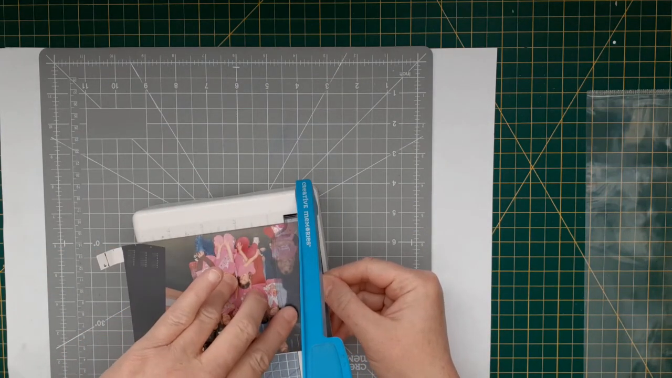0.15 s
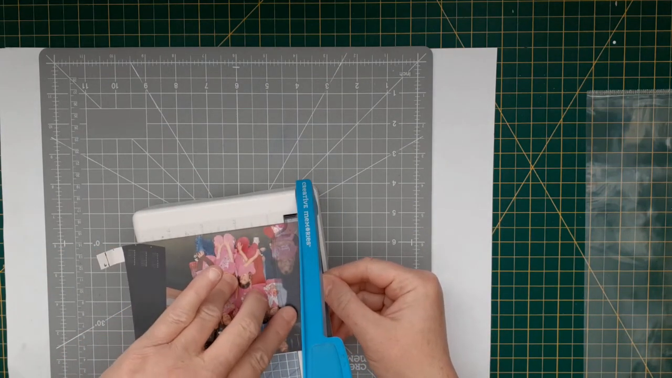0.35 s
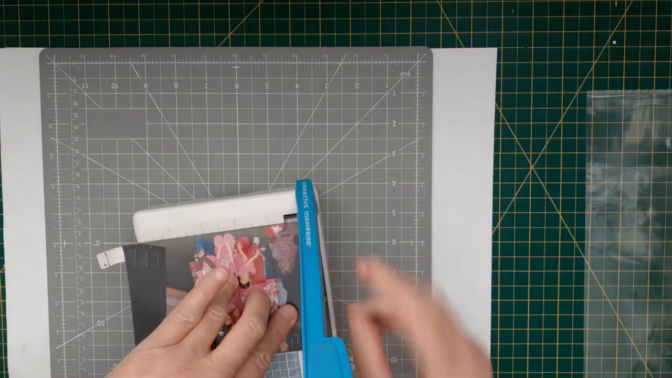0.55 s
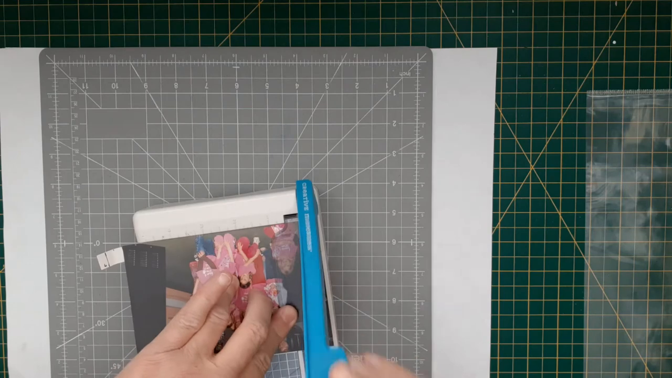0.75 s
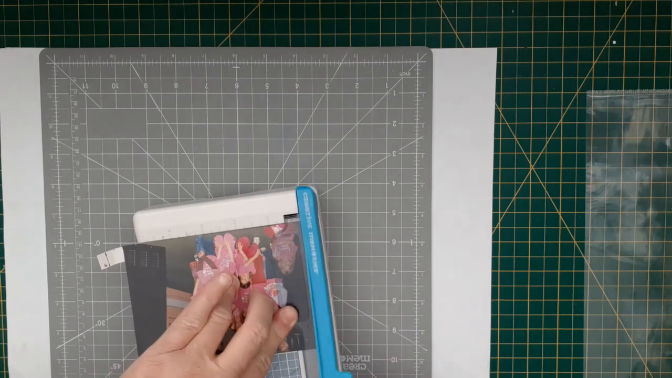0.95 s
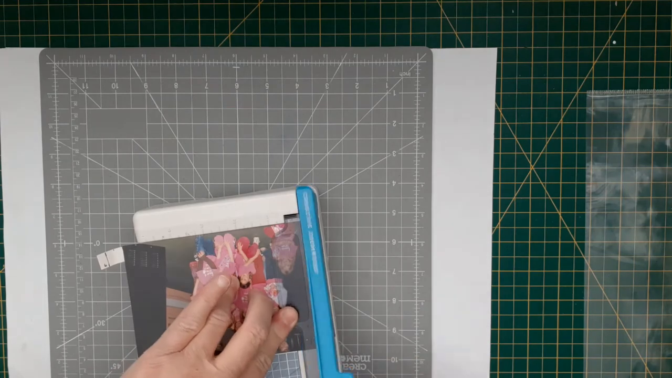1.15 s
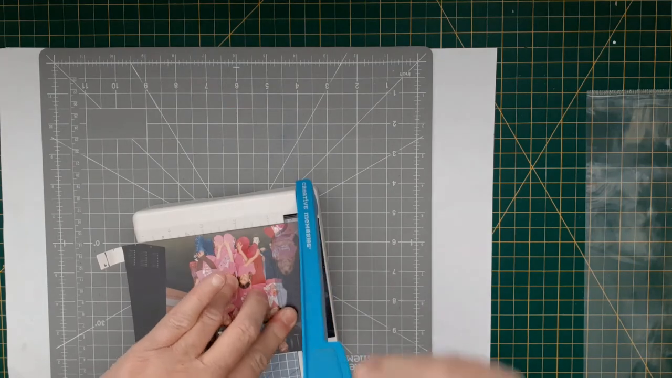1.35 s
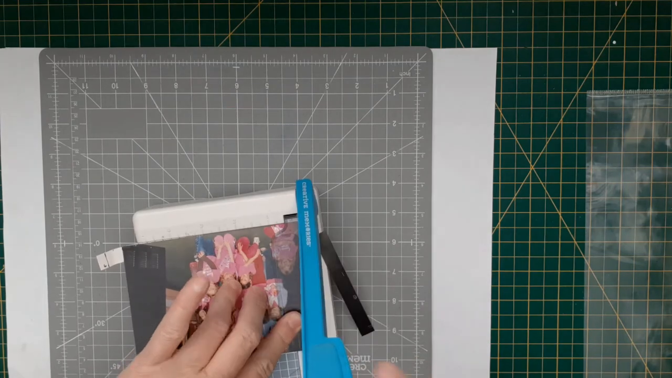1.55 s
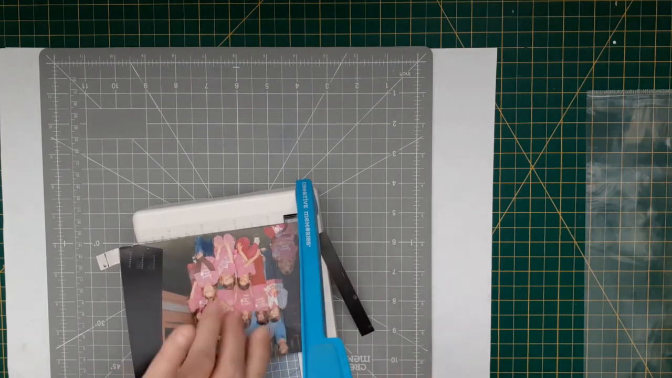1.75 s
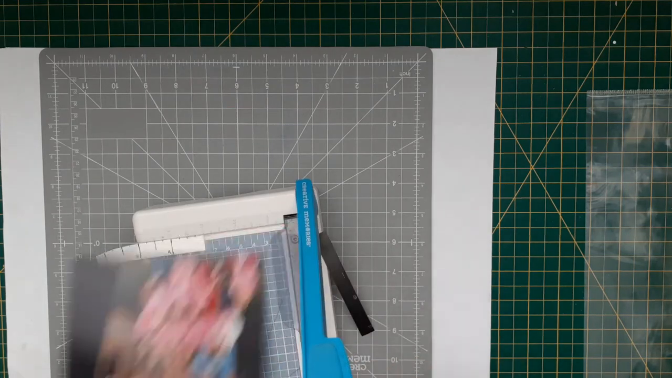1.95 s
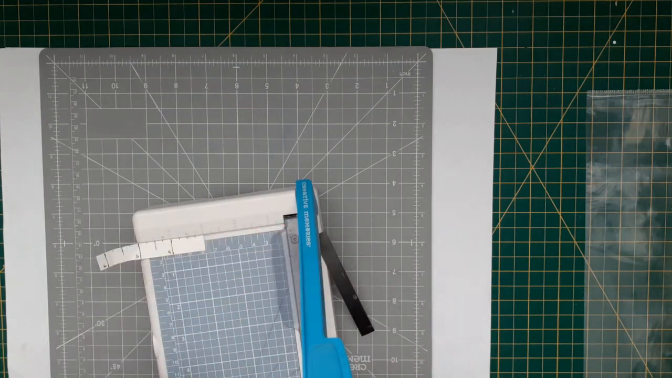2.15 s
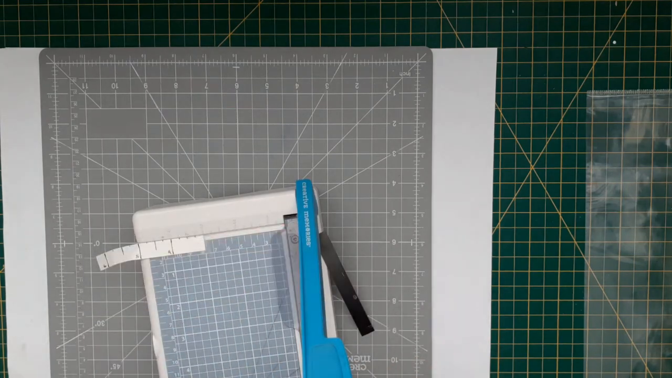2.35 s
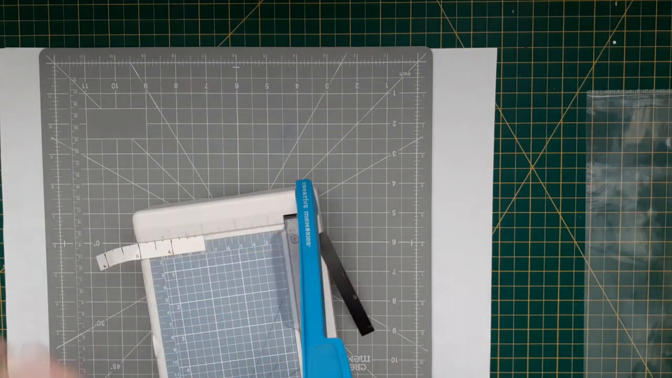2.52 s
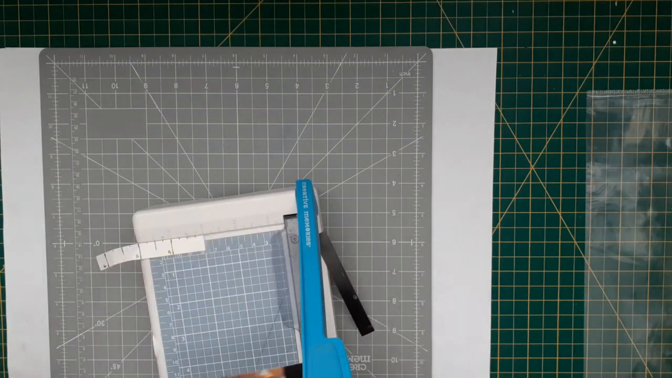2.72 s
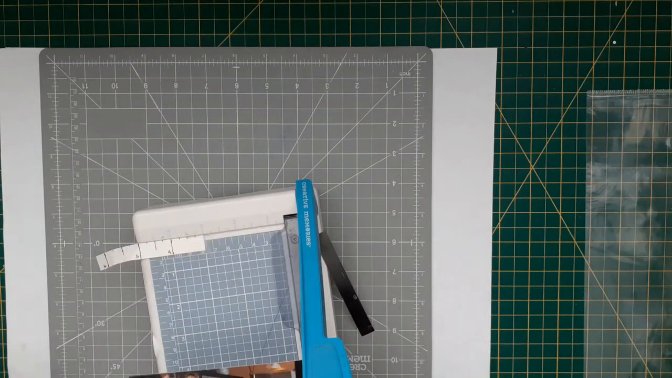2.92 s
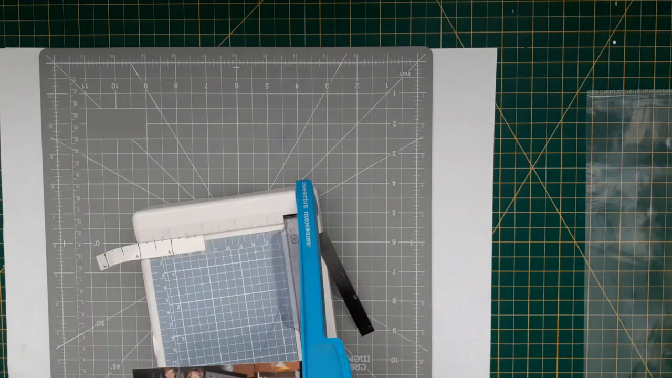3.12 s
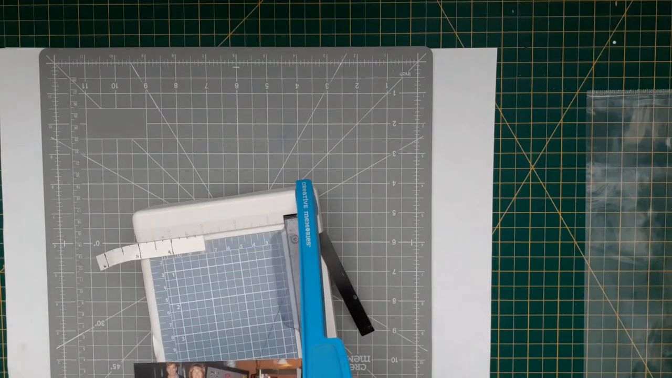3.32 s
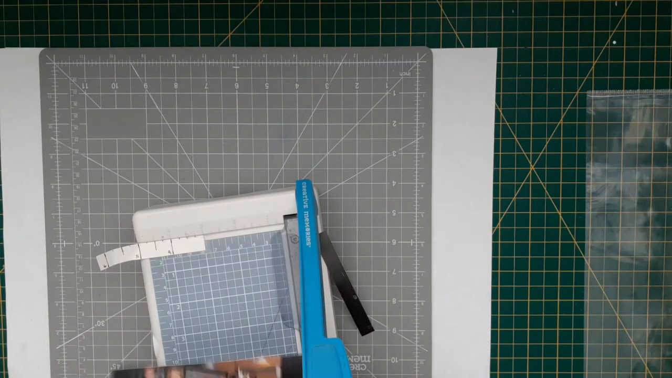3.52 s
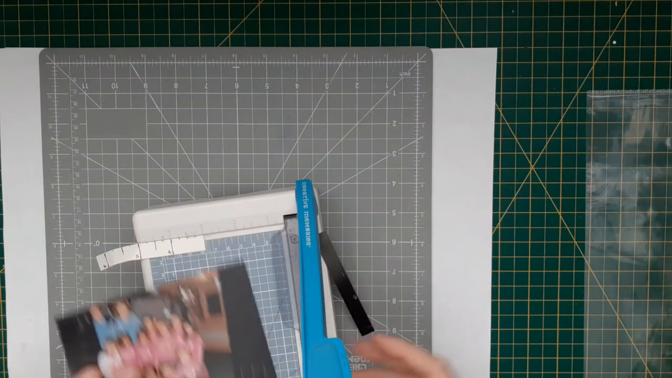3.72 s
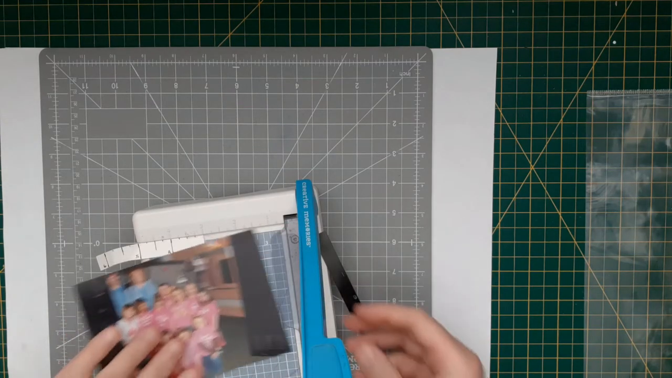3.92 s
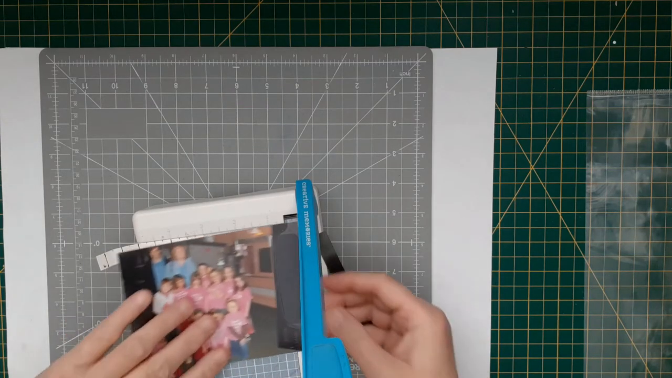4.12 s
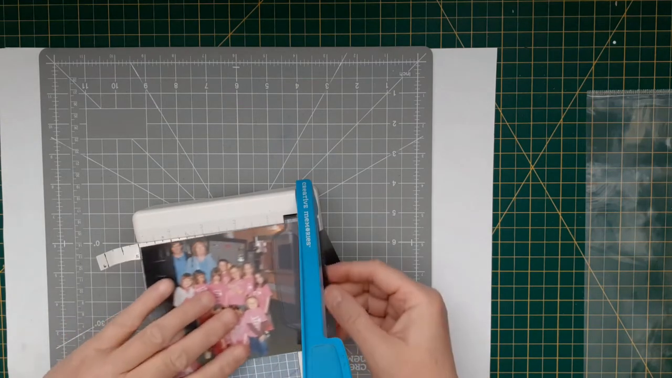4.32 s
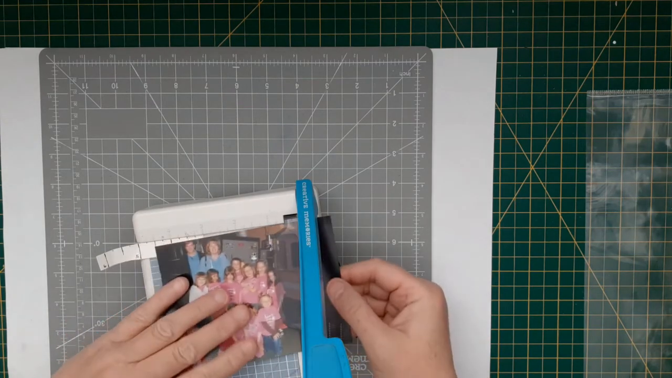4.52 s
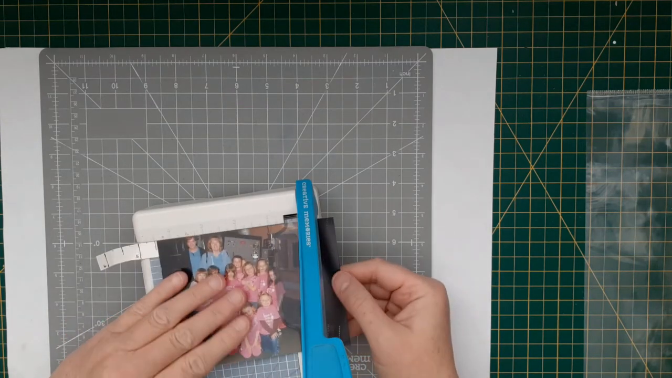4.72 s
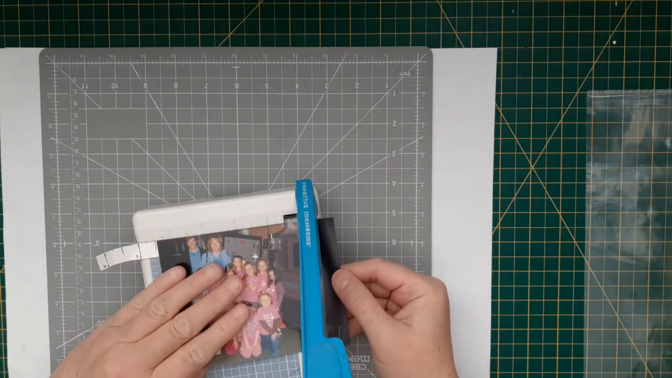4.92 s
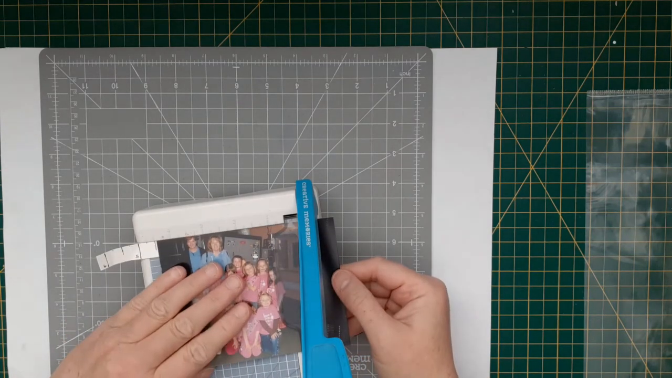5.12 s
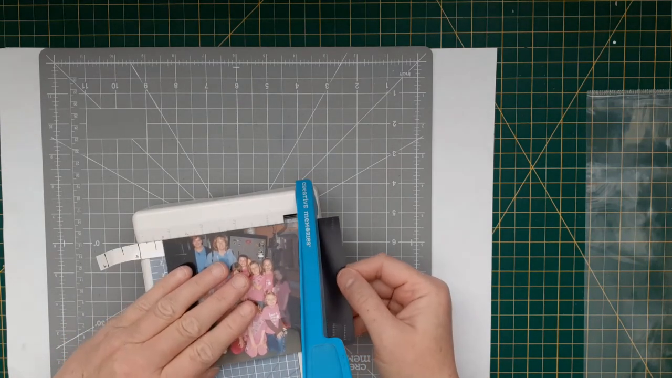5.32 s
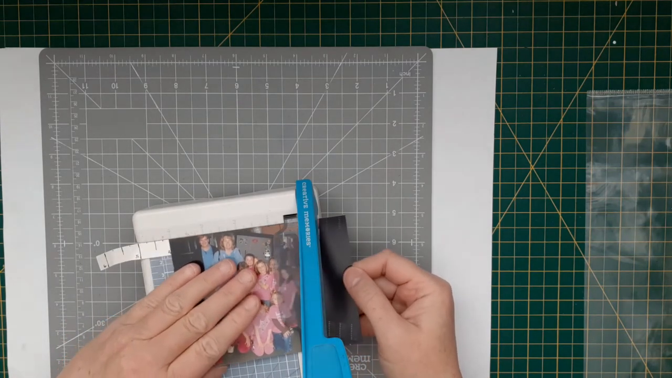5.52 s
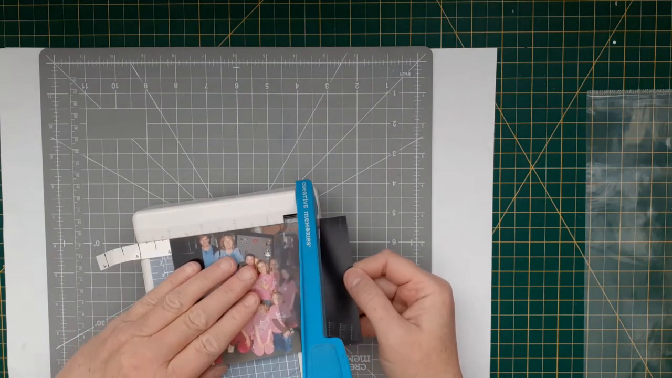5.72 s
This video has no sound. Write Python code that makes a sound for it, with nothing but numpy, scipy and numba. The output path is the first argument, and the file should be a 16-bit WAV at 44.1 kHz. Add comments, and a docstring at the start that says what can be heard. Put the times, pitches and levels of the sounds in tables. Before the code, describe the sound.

A lever trimmer blade rasps harshly through a stiff glossy print and thuds shut, then paper clicks, slides and a sharp snap follow over faint hum.

```python
"""Quiet air and a far motor's hum, then knocks and the rub of glossy paper on a small lever trimmer.
The blade rasps through a photo, thuds home and is lifted; slips excite its steel and plastic bed.
The print is slid off and put down; the next snaps against the bed and is slid into place.
Paper is shaped slip noise, each knock a short force on resonances; a deep drone runs up late.
It is heard from a phone above the desk in a dry room."""
import sys
import numpy as np
from scipy import signal
from scipy.fft import rfft, irfft
from scipy.io import wavfile
from scipy.ndimage import uniform_filter1d
from numba import njit

SR = 44100
rng = np.random.default_rng(int(sys.argv[2]) if len(sys.argv) > 2 else 0)


def master_out(mix):
    """Clip the mix to full scale and print it as 16-bit PCM to the path in sys.argv[1]."""
    frames = np.transpose(np.atleast_2d(mix))
    ceiling = np.clip(frames, -1, 1)
    pcm = np.round(ceiling * 32767).astype(np.int16)
    wavfile.write(sys.argv[1], SR, pcm)


N = 254016


def undb(db):
    """Decibels to amplitude."""
    return np.exp(np.asarray(db) * (np.log(10) / 20))


def unit(x):
    """Scale to rms 1."""
    return x / np.sqrt(np.mean(x ** 2))


def colour(x, points, size=4096):
    """Minimum-phase filter with the given (Hz, dB) response, built from its folded cepstrum."""
    hz, db = np.transpose(points)
    f = np.maximum(np.fft.rfftfreq(size, 1 / SR), 1)
    log_gain = np.log(undb(np.interp(np.log(f), np.log(hz), db)))
    cepstrum = irfft(log_gain)
    cepstrum[1:size // 2] *= 2
    cepstrum[size // 2 + 1:] = 0
    response = irfft(np.exp(rfft(cepstrum)))[:size // 2]
    filtered = signal.oaconvolve(np.atleast_2d(x), response[None], axes=1)
    return filtered[:, :x.shape[-1]].reshape(x.shape)


def resonate(x, hz, width_hz):
    """One resonance, gain 1 at its centre."""
    b, a = signal.iirpeak(hz, hz / min(width_hz, SR / 4), fs=SR)
    return signal.lfilter(b, a, x + 1e-18)


def ring(x, modes):
    """A body's modes, driven together with alternating sign."""
    return sum((-1) ** k * undb(db) * resonate(x, hz, width_hz)
               for k, (hz, width_hz, db) in enumerate(modes))


@njit
def glide(x, hz, width_hz):
    """A resonance whose centre moves, gain 1 at the centre (state-variable filter)."""
    y, band, low = np.empty(len(x)), 0., 0.
    for i in range(len(x)):
        g, k = np.tan(np.pi * hz[i] / SR), width_hz / hz[i]
        v = (band + g * (x[i] - low)) / (1 + g * (g + k))
        band, low, y[i] = 2 * v - band, low + 2 * g * v, k * v
    return y


# stereo width: freq_hz, side_minus_mid_db
WIDTH = [(30, -8.5), (130, -8), (300, -5.5), (700, -4), (1400, -3), (3000, 0.5), (16000, 0)]


def stereo(pair):
    """Two unrelated signals become left and right: more alike in the bass, unrelated in the treble."""
    side = colour(pair[1], WIDTH)
    return np.array([pair[0] + side, pair[0] - side])


def walk(rate_hz, size=N):
    """Smoothed random steps, rate_hz new values per second."""
    k = max(int(SR / rate_hz), 1)
    steps = np.repeat(rng.standard_normal(size // k + 1), k)
    return uniform_filter1d(steps, k)[:size]


def slips(per_s, spread_db, size=N):
    """Tiny slips and fibre breaks at random moments, a few much bigger than the rest."""
    chance = rng.random((2, size)) * SR / per_s
    hit = chance < 1
    clicks = np.zeros((2, size))
    clicks[hit] = undb(spread_db * np.minimum(-np.log(chance[hit]), 4))
    sign = 2 * rng.integers(0, 2, (2, size)) - 1
    return stereo(clicks * sign)


def add(out, s, sound):
    """Mix a short sound in at time s."""
    start = int(s * SR)
    out[:, start:start + sound.shape[1]] += sound[:, :N - start]


def swell(s, rise_s, fall_s):
    """A smooth rise to 1 at time s, then a fall that becomes exponential."""
    age = np.arange(N) / SR - s
    log_gain = np.where(age < 0, -(age / rise_s) ** 2, 1 - np.hypot(1, age / fall_s))
    return np.exp(np.maximum(log_gain, -20))


# spectrum of the room air: freq_hz, level_db (per Hz, relative)
AIR = [(25, -29), (60, -22.5), (100, -17), (140, -16), (200, -27.5), (330, -31.5), (600, -41), (850, -35.5),
       (2000, -40.5), (7000, -45.5), (14400, -45.5), (16000, -52)]
AIR_DB = -73.5  # rms above 400 Hz


def air():
    """Steady room air: noise with a fixed spectrum."""
    noise = colour(stereo(rng.standard_normal((2, N))), AIR)
    treble = signal.sosfilt(signal.butter(4, 400, "high", fs=SR, output="sos"), noise)
    return noise * undb(AIR_DB) / treble.std()


HUM_HZ, HUM_SAG_HZ, HUM_SAG_AT_S, HUM_SAG_S = 130.6, 8, 2.4, 1
HUM_DB, OCTAVE_DB = -71, -83
HUM_SWELL_AT_S, HUM_SWELL_DB, OCTAVE_SWELL_DB = 1.975, -68.5, -68.5


def motor():
    """A far motor hums with its octave, swelling once as its pitch sags."""
    t = np.arange(N) / SR
    hz = HUM_HZ - HUM_SAG_HZ * (1 + np.tanh((t - HUM_SAG_AT_S) / HUM_SAG_S)) / 2
    turn = 2 * np.pi * np.cumsum(hz * (1 + 0.0093 * walk(3.1))) / SR
    load = swell(HUM_SWELL_AT_S, rise_s=0.46, fall_s=0.28)
    low = (undb(HUM_DB) + undb(HUM_SWELL_DB) * load) * undb(.5 * walk(9))
    octave = (undb(OCTAVE_DB) + undb(OCTAVE_SWELL_DB) * load) * undb(np.tanh(walk(6.9)))
    return np.sqrt(2) * (low * np.sin(turn) + octave * np.sin(2 * turn))


# modes of the plastic bed: freq_hz, width_hz, level_db
BED = [(186, 30, -7), (333, 53, -9.5), (402, 28, -4.5), (542, 77, -1.5), (623.6, 46, 0), (802, 150, -2),
       (942.6, 66, 1), (1015, 80, 0.5), (1112, 52, 1), (1185, 110, -5.5), (1270, 15, -9.5), (1493, 34, 0.5)]
# response of a contact with stiff paper: freq_hz, level_db
CRACK = [(6400, -0.5), (7500, -12), (10800, -1), (16000, -4.5)]


def contact(db, hz, width_hz, rattle_s, bed_db, rattle=0.45, crack_db=-14, push_cycles=0.31):
    """An edge lands with a click and a short rattle, and the bed rings; levels are rms over 10 ms."""
    t = np.arange(SR // 12) / SR
    push_s = push_cycles / hz  # a softer contact pushes longer and sounds lower
    noise = stereo(rng.standard_normal((2, len(t))))
    force = rattle * noise * np.exp(-t / rattle_s) * (1 - np.exp(-t / push_s))
    push = np.exp(-(2 * t / push_s - 2) ** 2)
    force += 2 * push / push.sum()
    click = resonate(resonate(force, hz, width_hz), hz, 3.0 * width_hz)
    # a thin crack an octave higher
    click += undb(crack_db) * resonate(resonate(force, 2 * hz, hz), 2 * hz, 2 * hz)
    sound = undb(db) * unit(colour(click, CRACK)) + undb(bed_db) * unit(ring(force, BED))
    return sound * np.sqrt(SR / 100 / len(t))  # rms over the buffer to rms over 10 ms


# edges and fingers on the trimmer: start_s, contact_db, pitch_hz, bed_db
KNOCKS = [(.246, -44, 4640, -83), (.441, -53.5, 6400, -72), (.727, -46.5, 3604, -61.5),
          (1.094, -43, 1310, -68), (1.128, -38.5, 5330, -59), (1.767, -45, 3540, -75),
          (1.7885, -26, 5100, -50), (1.8009, -40, 3930, -49), (2.001, -46, 710, -53),
          (2.372, -51.5, 4620, -59), (2.396, -45.5, 4530, -51.5), (2.413, -45.5, 690, -48.5),
          (3.4896, -59, 4050, -70), (3.4992, -51.5, 2380, -62), (3.508, -51, 4500, -60)]
KNOCK_WIDTH, KNOCK_RATTLE_S = 0.68, 0.0049  # width as a share of the pitch


def knocks():
    """Edges and fingers knock on the trimmer: broad resonances struck by a short push."""
    out = np.zeros((2, N))
    for start_s, contact_db, hz, bed_db in KNOCKS:
        add(out, start_s, contact(contact_db, hz, KNOCK_WIDTH * hz, KNOCK_RATTLE_S, bed_db))
    return out


COAST_S, COAST_SHARE = .012, .4  # fall time: fixed part, plus share of the rise


def hand(pushes):
    """Each push speeds up and coasts to rest; one gain per level column, with powers adding."""
    power = 0
    for fastest_s, rise_s, *levels_db in pushes:
        speed = swell(fastest_s, rise_s, COAST_S + COAST_SHARE * rise_s)
        power = power + np.outer(undb(levels_db), speed) ** 2
    return np.sqrt(power)


# a print pushed over the bed: fastest_s, rise_s, hiss_db, flex_db, bed_db
PUSHES = [(.252, 0.0059, -54, -68, -82), (.44, 0.035, -63, -66.5, -90), (.61, 0.41, -68.5, -86.5, -90.5),
          (1.58, 0.071, -62, -84.5, -82), (1.69, 0.078, -54.5, -65, -78), (1.80, 0.016, -42, -49, -51.5),
          (1.875, 0.049, -43.5, -53, -71), (2.008, 0.034, -54.5, -66, -51),
          (2.402, 0.019, -54.5, -57.5, -52), (2.62, 0.076, -72.5, -83, -91),
          (3.532, 0.023, -52.5, -49, -56.5), (3.57, 0.025, -48, -54, -79.5),
          (3.615, 0.011, -53.5, -49, -66.5), (3.71, 0.12, -59.5, -68, -81.5),
          (3.98, 0.13, -49.5, -74.5, -92), (4.17, 0.2, -49.5, -66, -84.5), (4.43, 0.045, -51, -62.5, -90)]
# a print nudged under the fingers: fastest_s, rise_s, hiss_db
NUDGES = [(4.65, 0.078, -65), (4.94, .025, -67.5), (5.32, 0.081, -60.5)]
# surface hiss of pushes: freq_hz, level_db
HISS = [(1180, -50), (2000, -24.5), (2510, -17.5), (3140, -5.5), (4410, -5), (5880, 0), (6880, -6.5),
        (7440, -17), (9660, -15), (11000, -12.5), (15100, -19), (16000, -13.5)]
# surface hiss of nudges: freq_hz, level_db
NUDGE_HISS = [(1500, -24.5), (3000, -14.5), (4500, -10), (5800, 1.5), (6600, -7), (7600, -28),
              (11500, -17.5), (16000, -23)]
# flexing of the sheet: freq_hz, level_db
FLEX = [(500, -14.5), (900, -1.5), (1600, 3), (2500, 1), (3600, -19.5)]
# drumming of the bed: freq_hz, level_db
DRUM = [(120, -13), (280, 6.5), (600, 1), (900, -5.5), (1400, -19)]


def prints(flex_hz=1700, flex_width_hz=410.0):
    """Stiff glossy paper rubs over the bed: its surface hisses, the sheet flexes, the bed drums."""
    hiss, flex, bed = hand(PUSHES)
    nudge, = hand(NUDGES)
    rub = slips(per_s=7000, spread_db=2.0) * undb(1.5 * walk(70))
    out = hiss * unit(colour(rub, HISS)) + nudge * unit(colour(rub, NUDGE_HISS))
    # the sheet's resonance wanders as the fingers bend it
    note_hz = flex_hz * np.exp(.18 * walk(17))
    bent = np.array([glide(port, note_hz, float(flex_width_hz)) for port in rub])
    sheet = unit(rub) + undb(-5.0) * unit(bent)
    out += flex * unit(colour(sheet, FLEX))
    out += bed * unit(colour(ring(rub, BED), DRUM))
    return out


# paper edges and fingertips: centre_s, level_db, pitch_hz, half_length_s
SCUFFS = [(0.582, -66, 310, .012), (1.676, -60, 305, 0.048), (1.88, -46, 11440, 0.01),
          (2.022, -49, 11500, 0.0026), (2.141, -69, 322, 0.024), (3.537, -47, 1044, .014),
          (3.569, -48, 11700, 0.022), (3.61, -49.5, 2960, 0.01), (4.406, -63.5, 820, .016),
          (5.304, -69.5, 1930, .017)]


def scuffs(width=.35):
    """Paper edges and fingertips scuff briefly: noise bursts in a band, width a share of the pitch."""
    out = np.zeros((2, N))
    t = np.arange(-SR // 10, SR // 10) / SR
    for centre_s, db, hz, half_s in SCUFFS:
        noise = stereo(rng.standard_normal((2, len(t))))
        band = resonate(resonate(noise, hz, width * hz), hz, width * hz)
        add(out, centre_s + t[0], undb(db) * unit(band) * np.exp(-(t / half_s) ** 2))
    return out


# cut, lift, swing open: start_s, stop_s, rasp_db, bed_db, build_up_db, release_s
MOVES = [(0.713, 0.942, -23, -27, 31.5, 0.029), (1.091, 1.13, -41, -50.5, -1, 0.057),
         (1.17, 1.21, -58.5, -60, 10, 0.071)]
LET_GO_S, DRAG_DB = .011, -7  # quick drop to a lighter drag, which then dies away
BITE_S, BUILD_POWER = 0.0073, 1.56  # build-up levels off before the stop


def pressure(size):
    """Gains of rasp and bed: per move the edge bites, shifts by build_up_db to the stop, lets go."""
    t, out = np.arange(size) / SR, 0
    for start_s, stop_s, rasp_db, bed_db, build_db, release_s in MOVES:
        to_go = np.clip((stop_s - t) / (stop_s - start_s), 0, 1)
        bite = (1 + np.tanh((t - start_s) / BITE_S)) / 2
        build = undb(-build_db * to_go ** BUILD_POWER)
        after = np.maximum(t - stop_s, 0)
        drag = undb(DRAG_DB) * np.exp(-after / release_s)
        release = np.maximum(np.exp(-after / LET_GO_S), drag)
        out = out + np.outer(undb([rasp_db, bed_db]), bite * build * release)
    return out


# modes of the steel blade and its arm: freq_hz, width_hz, level_db
BLADE = [(1870, 70, -2.5), (2580, 30, 3.5), (3260, 170, -1.5), (3780, 60, -5.5), (4480, 30, 0),
         (4870, 60, 3.5), (5700, 230, -2.5), (6270, 30, -3)]
# spectrum of the shearing: freq_hz, level_db
SHEAR = [(710, -30), (1200, -0.5), (1440, -14.5), (1520, -8.5), (1950, -13.5), (2530, -9), (2790, -8.5),
         (3290, -9), (4600, -9.5), (6230, -12), (7490, -25), (10700, -15), (16000, -22)]
OPEN_HZ, CLOSED_HZ = 500, 1210  # bending note climbs as the free length shortens


def blade(bend_width_hz=190.0):
    """The edge catches and gives; each break rings the steel and drums the bed."""
    size = 3 * SR // 2
    edge, bed = pressure(size=size)
    flutter = undb(1.4 * walk(240, size=size) + 2.7 * walk(70, size=size))
    breaks = slips(per_s=3200, spread_db=1.5, size=size) * flutter
    # the cutting point travels along the blade, so each mode is driven now more, now less
    steel = sum(ring(breaks, [mode]) * undb(5 * np.tanh(walk(35, size=size))) for mode in BLADE)
    rasp = unit(colour(breaks, SHEAR)) + undb(-6.5) * unit(steel)
    cut, lift, swing = MOVES
    closed = np.interp(np.arange(size) / SR, [cut[0], cut[1], lift[0], swing[1]], [0, 1, 1, 0])
    bend_hz = OPEN_HZ * (CLOSED_HZ / OPEN_HZ) ** closed
    bend = np.array([glide(port, bend_hz, float(bend_width_hz)) for port in breaks])
    drum = unit(ring(breaks, BED)) + undb(1) * unit(bend)
    drum += undb(-6.0) * unit(colour(breaks, DRUM))
    out = np.zeros((2, N))
    add(out, 0, edge * unit(rasp) + bed * unit(drum))
    return out


def thud(at_s=.94, clack_db=-33, clack_s=0.014, desk_db=-35, desk_s=0.021, late_s=0.0066):
    """The arm reaches its stop with a dull clack; a moment later the desk takes the blow."""
    t = np.arange(SR // 4) / SR
    push = stereo(rng.standard_normal((2, len(t))))
    stop = unit(resonate(resonate(push, 400, 130), 360, 300))
    desk_modes = [(65, 26, -2), (120, 37, 0), (190, 59, -1)]  # freq_hz, width_hz, level_db
    desk = unit(resonate(ring(push, desk_modes), 170, 260))

    def blow(age, decay_s):
        """Linear 8 ms rise times an exponential decay."""
        return np.clip(age / 0.008, 0, 1) * np.exp(-np.maximum(age, 0) / decay_s)

    clack = undb(clack_db) * stop * blow(t, clack_s)
    out = np.zeros((2, N))
    add(out, at_s, clack + undb(desk_db) * desk * blow(t - late_s, desk_s))
    return out


# corner of the print flicking over a ridge: start_s, level_db
TICKS = [(1.6845, -37.5), (1.7211, -42), (2.149, -54), (3.9862, -39), (4.111, -43.5)]
TICK_HZ, TICK_WIDTH_HZ, TICK_RATTLE_S = 5800, 1480, .003
TICK_BED_DB = -35  # relative to the tick


def ticks():
    """A corner of the print flicks over a ridge, always ringing the same note."""
    out = np.zeros((2, N))
    for start_s, db in TICKS:
        add(out, start_s, contact(db, TICK_HZ, TICK_WIDTH_HZ, TICK_RATTLE_S, db + TICK_BED_DB))
    return out


SNAP_S = 3.6521


def snap(chatter_after_s=0.001053, slap_after_s=.0074):
    """The bowed print's edge strikes the bed and chatters; then its face slaps down flat."""
    strike = contact(db=-26, hz=2510, width_hz=2000, rattle_s=.0003, bed_db=-41.5)
    chatter = contact(db=-24.0, hz=4400, width_hz=5400, rattle_s=.003, bed_db=-51.5)
    slap = contact(db=-30.5, hz=1060, width_hz=420, rattle_s=0.003, bed_db=-43.5)
    out = np.zeros((2, N))
    add(out, SNAP_S, strike)
    add(out, SNAP_S + chatter_after_s, chatter)
    add(out, SNAP_S + slap_after_s, slap)
    return out


DRONE_HZ, RUN_UP_HZ, RUN_UP_FROM_S, RUN_UP_S = 147.2, 33.5, 4.05, 0.26
DRONE_DB, DRONE_PEAK_S, DRONE_RISE_S, DRONE_FADE_S = -56, 4.75, .36, 0.65


def drone():
    """A deep tone runs up to a nearly steady pitch, swells and fades, with rumble around it."""
    age = np.maximum(np.arange(N) / SR - RUN_UP_FROM_S, 0)
    hz = DRONE_HZ - RUN_UP_HZ * np.exp(-age / RUN_UP_S)
    tone = unit(np.sin(2 * np.pi * np.cumsum(hz * (1 + .004 * walk(14))) / SR))
    modes = [(90.4, 11, -1.5), (150.6, 33, 0.5), (189.0, 10.0, 3.5), (271.3, 74.5, -9)]
    rumble = ring(stereo(rng.standard_normal((2, N))), modes)
    rumble = unit(colour(rumble, [(40, 0.0), (90, -1), (330, 3.0), (600, -30), (2000, -63)]))
    envelope = swell(DRONE_PEAK_S, DRONE_RISE_S, DRONE_FADE_S)
    return undb(DRONE_DB) * envelope * (tone + undb(-8) * rumble)


DIP_AT_S, DIP_HALF_S, DIP_DB = 1.444, 0.016, -40.5


def background():
    """Quiet air, the motor and the drone; all dip briefly together."""
    dip = np.exp(-((np.arange(N) / SR - DIP_AT_S) / DIP_HALF_S) ** 2)
    return (air() + motor() + drone()) * undb(DIP_DB * dip)


ROOM_T60_S, ROOM_DB = 0.17, -6  # tail level relative to the direct sound


def room(x, build_s=0.0023):
    """Desk and near walls add a short dense tail: noise decaying exponentially after a quick build."""
    t = np.arange(SR // 3) / SR
    decay = np.exp(-np.log(1000) * t / ROOM_T60_S)
    tail = stereo(rng.standard_normal((2, len(t)))) * decay * (1 - np.exp(-(t / build_s) ** 2))
    tail = colour(tail, [(100, 0.58), (1000, 0.49), (5000, 1.0), (15000, 0.15)])
    response = undb(ROOM_DB) * unit(tail) / np.sqrt(len(t))
    response[:, 0] += 1
    wet = signal.oaconvolve(x, response, axes=-1)[:, :N]
    return wet / np.sqrt(1 + undb(2 * ROOM_DB))  # keep the total power


# the two microphone ports: freq_hz, left_minus_right_db
PORTS = [(100, 0), (1200, -1), (3500, -0.5), (5600, 2.5), (7200, -2.5), (8500, 9), (11000, 14.5),
         (13000, 9.5), (14300, 0), (16000, 5.5)]


def scene():
    """Trimmer and prints in the room, picked up by two ports over the background."""
    near = room(knocks() + prints() + scuffs() + blade() + thud() + ticks() + snap())
    # the ports colour the treble differently, each by half the difference
    left = colour(near[0], [(hz, db / 2) for hz, db in PORTS])
    right = colour(near[1], [(hz, -db / 2) for hz, db in PORTS])
    return np.array([left, right]) + background()


TOP_HZ = 15900


def record(dry):
    """The phone cuts the top: a steep elliptic low-pass."""
    return signal.sosfilt(signal.ellip(10, .2, 70, TOP_HZ, fs=SR, output="sos"), dry)


dry = scene()
out = record(dry)
master_out(out)
```